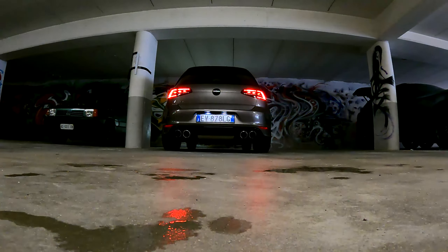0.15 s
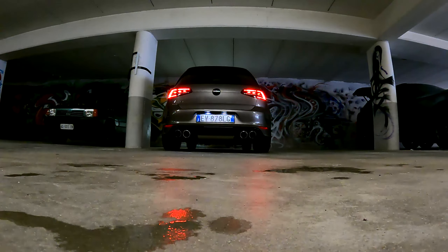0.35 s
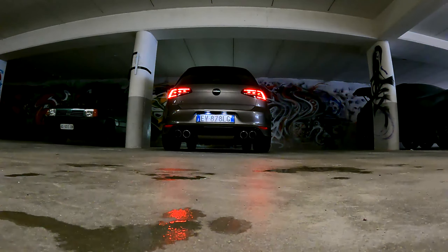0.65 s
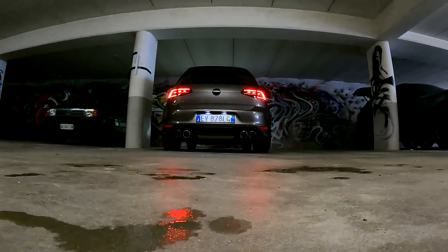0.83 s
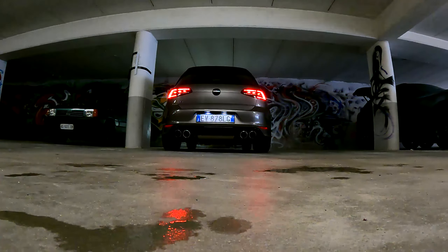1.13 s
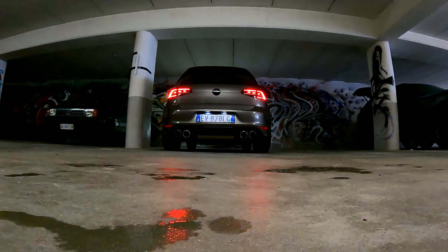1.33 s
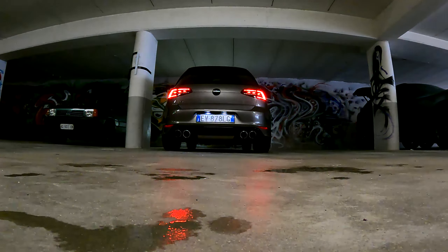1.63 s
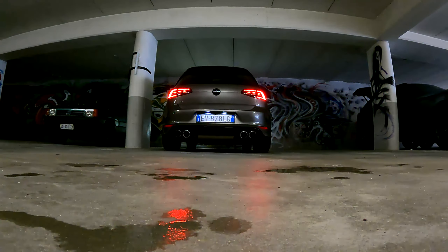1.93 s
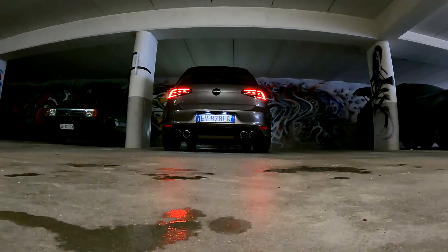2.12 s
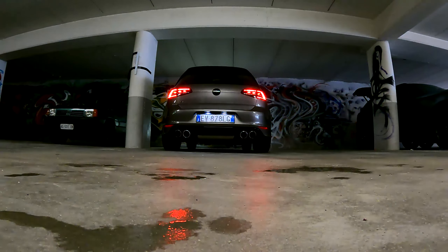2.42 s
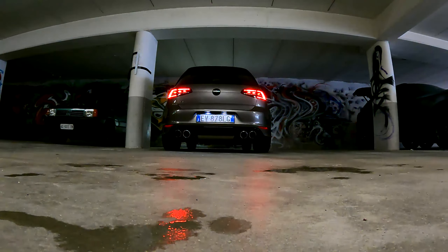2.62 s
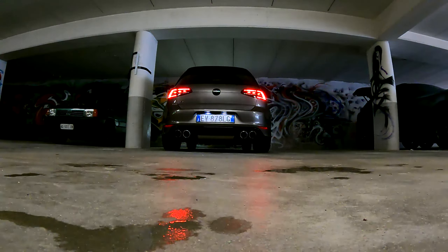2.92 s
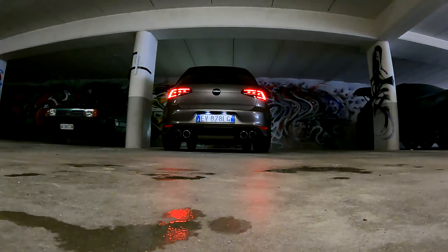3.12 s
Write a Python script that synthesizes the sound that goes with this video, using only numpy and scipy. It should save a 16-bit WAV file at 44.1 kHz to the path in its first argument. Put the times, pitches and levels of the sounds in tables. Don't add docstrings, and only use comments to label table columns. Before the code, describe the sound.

A car engine idles with a low boom, then revs twice with crackling exhaust in concrete.

```python
import sys
import numpy as np
from scipy import signal
from scipy.fft import rfft, irfft
from scipy.io import wavfile
from scipy.ndimage import uniform_filter1d

SR = 44100
rng = np.random.default_rng(int(sys.argv[2]) if len(sys.argv) > 2 else 0)


def digitize_waveform(pressure):
    field = np.atleast_2d(pressure).T
    bounded = np.clip(field, -1, 1)
    quanta = np.round(bounded * 32767).astype(np.int16)
    wavfile.write(sys.argv[1], SR, quanta)


def voltage_ratio(level):
    return 10 ** (np.asarray(level, float) / 20)


N = 143766
RUN_IN = 40000
LONG = N + RUN_IN

# time_s, firing_rate_hz
FIRING_RATE = [(0.0, 32.7), (0.35, 32.5), (0.55, 31.4), (0.73, 31.3), (0.85, 32.33), (1.04, 36.47),
               (1.2, 34.43), (1.48, 35.88), (1.6, 47.56), (1.71, 54.9), (1.85, 50.67), (2.1, 47.1),
               (2.27, 42.32), (2.41, 56.95), (2.53, 72.82), (2.62, 79.36), (2.75, 73.4), (2.96, 63.56),
               (3.26, 55.27)]
# time_s, level_db
THROTTLE_LOAD = [(0, -40.5), (.3, -43), (.9, -44.5), (1.05, -35), (1.2, -36.5), (1.47, -41.5),
                 (1.58, -23.5), (1.75, -31), (1.9, -34), (2.1, -37.5), (2.27, -40.5), (2.38, -27.5),
                 (2.6, -28), (2.8, -28.5), (3.05, -36), (3.26, -40.5)]
# time_s, level_db
BOOM_SWELL = [(0.0, -8.5), (0.1, -13), (0.53, -12.5), (0.71, -22.5), (0.95, -15), (1.27, -20.5),
              (1.35, -14), (1.44, -26.5), (1.52, -13.5), (1.58, -20.5), (1.7, -15.5), (1.82, -11.5),
              (1.95, -17), (2.08, -17.5), (2.11, -13), (2.2, -21), (2.33, -24), (2.45, -11.5),
              (2.65, -17.5), (2.69, -36), (2.8, -27), (2.94, -10.5), (3.05, -12.5), (3.12, -13),
              (3.26, -13)]
# centre_hz, width_hz, level_db
SILENCER_IDLE = [(36.6, 9.5, -3), (100.7, 29.5, -2), (130.5, 7, 5), (159, 9, 4), (189, 8, -5), (226, 9, -6),
                 (288.4, 32, -12), (328, 4, -1), (370, 40, -18)]
# centre_hz, width_hz, level_db
SILENCER_FAST = [(43.3, 17.8, 1), (124.2, 26.3, 5), (146.6, 38.4, 0), (212.5, 32.5, -5), (295, 41.2, -4.5),
                 (376.7, 107, -10)]
# centre_hz, width_hz, level_db
TAILPIPE_PEAKS = [(567.8, 206, 0.5), (654.7, 163, -1.5), (832.3, 111, -6.5), (924, 65, -7.5),
                  (1072, 183, -7), (1296, 1000, -29), (2290, 410, -33)]
# start_s, snap_db, ring_db, spit_db
FIRST_BLIP = [(1.0344, -39, -46, -48), (1.0595, -39, -26.5, -39), (1.0884, -34, -28, -53),
              (1.1434, -40, -21, -46), (1.51, -30, -28, -41.5), (1.5394, -23.5, -21, -35),
              (1.5628, -22.5, -30, -50), (1.5848, -22, -14.5, -37), (1.6064, -41, -26, -28.5),
              (1.6262, -28, -18.5, -43), (1.6447, -25.5, -8.5, -31.5), (1.6636, -21, -12.5, -46.5),
              (1.6834, -46, -33.5, -54), (1.701, -20, -13, -28), (1.721, -22.5, -11, -41.5),
              (1.7394, -58, -18, -58), (1.7584, -22.5, -12.5, -31), (1.7764, -39, -8, -50),
              (1.7968, -28.5, -16, -43), (1.8154, -23, -21.5, -46), (1.8357, -24.5, -24.5, -46),
              (1.8534, -32, -14, -37), (1.9344, -41.5, -17, -54)]
# start_s, snap_db, ring_db, spit_db
SECOND_BLIP = [(2.3451, -22.5, -25, -45), (2.3635, -34, -23, -37.5), (2.3825, -20, -16, -33),
               (2.3999, -21.5, -11, -58), (2.4169, -16.5, -26.5, -49), (2.4339, -30, -16, -35),
               (2.4504, -21, -12.5, -39), (2.4668, -23.5, -15, -32.5), (2.4814, -22, -30.5, -31.5),
               (2.4964, -25, -12.5, -43.5), (2.5107, -19.5, -20, -40), (2.5252, -28.5, -12, -44.5),
               (2.5374, -22, -15.5, -53), (2.5514, -31.5, -22.5, -54), (2.5641, -21, -9.5, -44),
               (2.578, -16, -15.5, -39), (2.5914, -23.5, -23, -46.5), (2.603, -17.5, -16, -51),
               (2.6154, -16.5, -28, -34.5), (2.6289, -19, -20.5, -63.5), (2.6414, -30, -18, -46.5),
               (2.6554, -40, -10.5, -53), (2.6678, -21.5, -33, -46.5), (2.6934, -30, -18, -41.5),
               (2.7062, -24, -16, -37.5)]
# freq_hz, density_db
HISS_COLOUR = [(1300, 0), (2200, -2.5), (3000, -8), (4000, -7.5), (5500, -12), (8000, -23.5), (11500, -36),
               (14000, -48.5)]
# freq_hz, level_db, t60_s
CONCRETE = [(90, -8, 1.5), (250, -5, 1.5), (700, -6, 1.8), (2000, -11, 1.2), (6000, -5, .6)]
# freq_hz, side_minus_mid_db
PORT_WIDTH = [(60, -16), (130, -28.5), (270, -25), (580, -11), (1200, -2), (4000, -4.5), (8000, -7),
              (12000, -9)]

FIRST_FIRING_TURN, FIRING_LEAD_S = .71, .003
PULSE_SCATTER_DB, LOW_SCATTER_DB = 2.2, 1.3
IDLE_TOP_HZ, OVERRUN_SCATTER_DB, OVERRUN_JITTER_S = 38, 2.5, .0009
FAST_FROM_HZ, FAST_OVER_HZ = 37, 6
SILENCER_DB, SILENCER_DB_PER_LOAD_DB, SPEED_TILT = -20.5, 0.68, 0.65
TAILPIPE_DB, PIPE_CUT_HZ = 2.5, 3230
PUFF_DB, PUFF_S, FLOW_SHARE = 2, .01, .6
SAME_FIRING_S = .007
SNAP_LOW_HZ, SNAP_HIGH_HZ = 750, 2450
RASP_HZ, RASP_WIDTH_HZ, RASP_DB = 2200, 300, -3
FLOOR_ECHO_S, FLOOR_ECHO_GAIN = .0021, .4
CRACK_RING_DB, CRACK_RING_LAG_S = 37.5, 0.00157
SPIT_DB, SPIT_LAG_S, SPIT_DECAY_S, SPIT_RISE_S = 5, .004, .002, .001
BOOM_HZ, BOOM_WIDTH_HZ = 65.5, 19.3
BOOM_RING_WIDTH_HZ, BOOM_RING_DB, BOOM_RING_SCATTER_DB = 4.6, 7.5, 10.5
HISS_DB, HISS_DB_PER_LOAD_DB, HISS_DB_PER_OCTAVE = -50, 0.32, 2.5
HISS_GATE, HISS_GATE_S = 0.33, .009
PORT_LAG_S, PORT_LAG_TOP_HZ = 2.6e-5, 5500
PEAK_LIMIT = .85


def rms_one(x):
    return x / np.sqrt(np.mean(x ** 2) + 1e-20)


def in_time(rows):
    time_s, value = np.transpose(rows)
    return np.interp((np.arange(LONG) - RUN_IN) / SR, time_s, value)


def at_hz(points, hz, axis=1):
    table = np.array(points)
    return np.interp(np.log(hz + 1), np.log(table[:, 0]), table[:, axis])


def bandpass(x, low_hz, high_hz, order):
    sos = signal.butter(order, [low_hz, high_hz], "band", fs=SR, output="sos")
    return signal.sosfilt(sos, x)


def soften(x, cut_hz):
    return signal.sosfilt(signal.butter(4, cut_hz, fs=SR, output="sos"), x)


def resonance(x, hz, width_hz):
    r = np.exp(-np.pi * width_hz / SR)
    zeros = [(1 - r * r) / 2, 0, (r * r - 1) / 2]
    poles = [1, -2 * r * np.cos(2 * np.pi * hz / SR), r * r]
    return signal.lfilter(zeros, poles, x + 1e-18)


def double_resonance(x, hz, width_hz):
    return resonance(resonance(x, hz, width_hz), hz, width_hz)


def parallel(x, peaks, filt):
    total = 0
    for k, (hz, width_hz, level_db) in enumerate(peaks):
        total = total + voltage_ratio(level_db) * (-1) ** k * filt(x, hz, width_hz)
    return total


def fade(clicks, decay_s):
    return signal.lfilter([1], [1, -np.exp(-1 / (decay_s * SR))], clicks + 1e-18)


def firings():
    turns = np.cumsum(in_time(FIRING_RATE)) / SR
    turns = turns - turns[RUN_IN] - FIRST_FIRING_TURN
    return np.flatnonzero(np.diff(np.floor(turns)))[1:] - int(FIRING_LEAD_S * SR)


def pulses(at, scatter_db):
    out = np.zeros(LONG)
    out[at] = -voltage_ratio(scatter_db * np.clip(rng.standard_normal(len(at)), -3, 1.4))
    return out


def garage(x):
    t = np.arange(RUN_IN) / SR
    tail = 0
    for low_hz in 44 * 2. ** np.arange(9) / 1.3:
        band = bandpass(rng.standard_normal((2, RUN_IN)), low_hz, 2 * low_hz, 2)
        hz = low_hz * np.sqrt(2)
        decay = voltage_ratio(-60 * t / at_hz(CONCRETE, hz, axis=2))
        shape = decay * np.clip((t - .008) / 0.021, 0, 1)
        side_db = at_hz(PORT_WIDTH, hz) + 3
        gain = voltage_ratio(at_hz(CONCRETE, hz) + np.array([[0], [side_db]]))
        tail = tail + gain * band * shape / np.sqrt(np.sum(shape ** 2))
    mid, side = signal.fftconvolve(x[None], tail, axes=1)[:, :LONG]
    return np.array([mid + side, mid - side])


def ports(x):
    sos = signal.butter(2, PORT_LAG_TOP_HZ, fs=SR, output="sos")
    slope = np.gradient(signal.sosfiltfilt(sos, x.mean(axis=0)))
    return x + .5 * PORT_LAG_S * SR * slope * [[-1], [1]]


def hiss(at, load_db):
    beat = fade(soften(-pulses(at, PULSE_SCATTER_DB), 300), HISS_GATE_S)
    gate = 1 + HISS_GATE * rms_one(beat)
    hz = np.arange(LONG // 2 + 1) * SR / LONG
    colour = voltage_ratio(at_hz(HISS_COLOUR, hz)) * hz ** 2 / (hz ** 2 + 900 ** 2)
    noise = irfft(rfft(gate * rng.standard_normal(LONG)) * colour, LONG)
    load_rise_db = HISS_DB_PER_LOAD_DB * (load_db - load_db.min())
    speed_rise_db = HISS_DB_PER_OCTAVE * np.log2(in_time(FIRING_RATE) / FIRING_RATE[0][1])
    return voltage_ratio(HISS_DB + load_rise_db + speed_rise_db) * rms_one(noise)


def boom(at):
    tone = double_resonance(pulses(at, 0), BOOM_HZ, BOOM_WIDTH_HZ)
    ring = resonance(pulses(at, BOOM_RING_SCATTER_DB), BOOM_HZ, BOOM_WIDTH_HZ)
    ring = resonance(ring, BOOM_HZ, BOOM_RING_WIDTH_HZ)
    tone = rms_one(tone) + voltage_ratio(BOOM_RING_DB) * rms_one(ring)
    level = np.sqrt(uniform_filter1d(tone ** 2, size=5000))
    return voltage_ratio(in_time(BOOM_SWELL)) * tone / level


def tailpipe(x):
    return parallel(soften(x, PIPE_CUT_HZ), TAILPIPE_PEAKS, double_resonance)


def cracks():
    start_s, *levels_db = np.transpose(np.vstack([FIRST_BLIP, SECOND_BLIP]))
    clicks = np.zeros((3, LONG))
    clicks[:, (start_s * SR).astype(int) + RUN_IN] = -voltage_ratio(np.array(levels_db))
    snap = 14 * bandpass(clicks[0] + 1e-18, SNAP_LOW_HZ, SNAP_HIGH_HZ, 3)
    snap = snap + voltage_ratio(RASP_DB) * resonance(snap, RASP_HZ, RASP_WIDTH_HZ)
    snap = snap + FLOOR_ECHO_GAIN * np.roll(snap, int(FLOOR_ECHO_S * SR))
    ring = tailpipe(np.roll(clicks[1], int(CRACK_RING_LAG_S * SR)))
    gust = fade(np.roll(clicks[2], int(SPIT_LAG_S * SR)), SPIT_DECAY_S)
    gust = fade(gust, SPIT_RISE_S) / (SPIT_RISE_S * SR)
    spit = bandpass(gust * rng.standard_normal(LONG), 3000, 7000, 3)
    return snap + voltage_ratio(CRACK_RING_DB) * ring + voltage_ratio(SPIT_DB) * spit


def overrun(at):
    rate_hz = in_time(FIRING_RATE)
    not_rising_steeply = np.gradient(rate_hz)[at] * SR < 70
    return ((rate_hz[at] > IDLE_TOP_HZ) & not_rising_steeply) * 1.


def silencer(at):
    ragged = overrun(at)
    late = (OVERRUN_JITTER_S * SR * ragged * rng.standard_normal(len(at))).astype(int)
    low = pulses(np.minimum(at + late, LONG - 1), LOW_SCATTER_DB + OVERRUN_SCATTER_DB * ragged)
    low = soften(low, 400)
    rate_hz = in_time(FIRING_RATE)
    fast = np.clip((rate_hz - FAST_FROM_HZ) / FAST_OVER_HZ, 0, 1)
    rung = parallel((1 - fast) * low, SILENCER_IDLE, resonance)
    rung = rung + parallel(fast * low, SILENCER_FAST, resonance)
    return rms_one(rung / rate_hz ** SPEED_TILT)


def exhaust(at, load_db):
    kick = pulses(at, PULSE_SCATTER_DB)
    flow = rms_one(fade(-kick, PUFF_S)) + FLOW_SHARE
    puff = rms_one(flow * rng.standard_normal(LONG))
    crack_s = np.vstack([FIRST_BLIP, SECOND_BLIP])[:, 0]
    gap_s = np.abs((at[:, None] - RUN_IN) / SR - crack_s).min(axis=1)
    kick = rms_one(kick)
    kick[at[gap_s < SAME_FIRING_S]] = 0
    high = rms_one(tailpipe(kick + voltage_ratio(PUFF_DB) * puff))
    low_db = SILENCER_DB + SILENCER_DB_PER_LOAD_DB * (load_db - load_db.mean())
    return voltage_ratio(low_db) * silencer(at) + voltage_ratio(load_db + TAILPIPE_DB) * high


def scene():
    at, load_db = firings(), in_time(THROTTLE_LOAD)
    car = exhaust(at, load_db) + cracks() + hiss(at, load_db)
    return ports(car + garage(car) + boom(at))[:, RUN_IN:]


def band_limit(x):
    return signal.sosfilt(signal.butter(12, 14300, fs=SR, output="sos"), x)


def record(dry):
    mix = PEAK_LIMIT * np.tanh(dry / PEAK_LIMIT)
    return band_limit(mix)


dry = scene()
out = record(dry)
digitize_waveform(out)
```